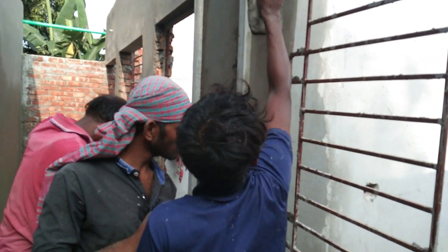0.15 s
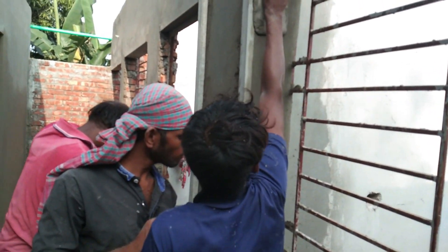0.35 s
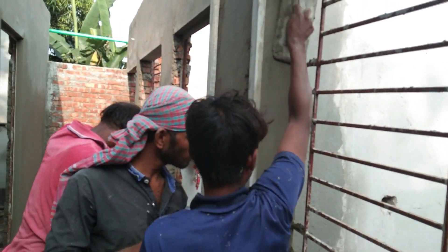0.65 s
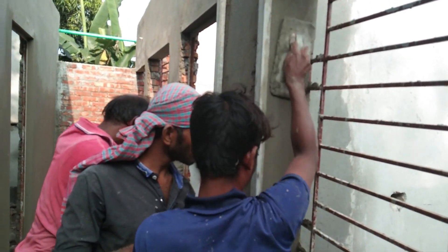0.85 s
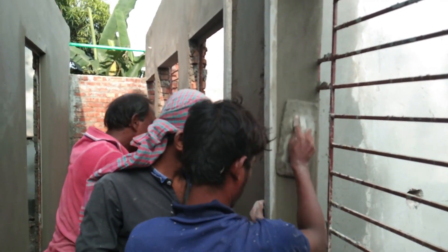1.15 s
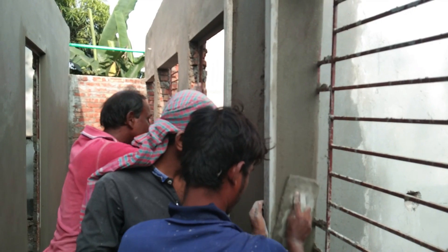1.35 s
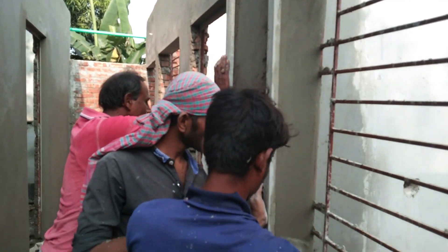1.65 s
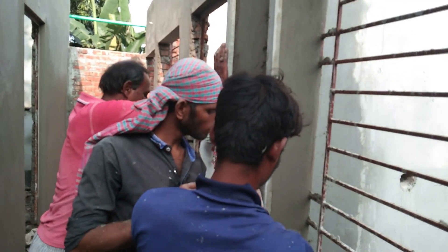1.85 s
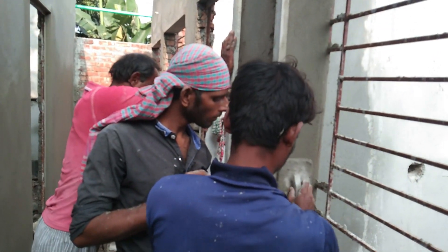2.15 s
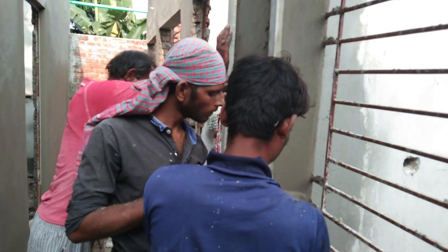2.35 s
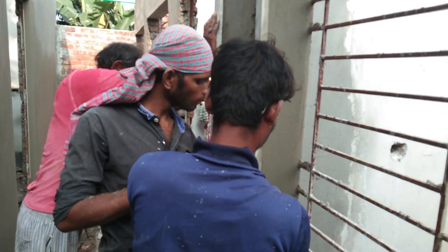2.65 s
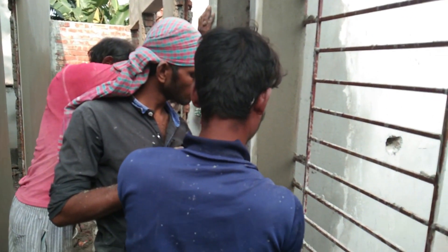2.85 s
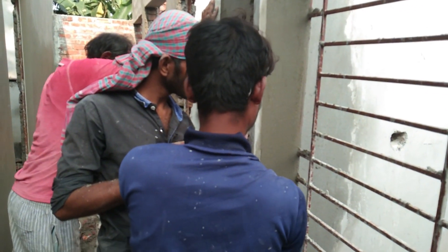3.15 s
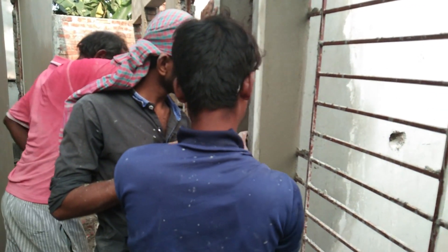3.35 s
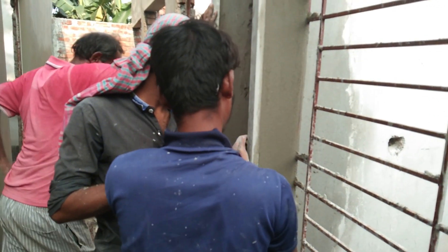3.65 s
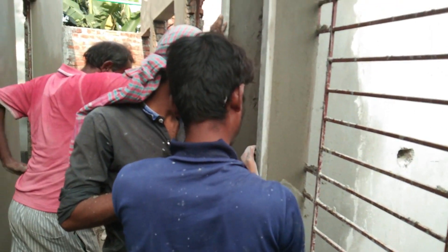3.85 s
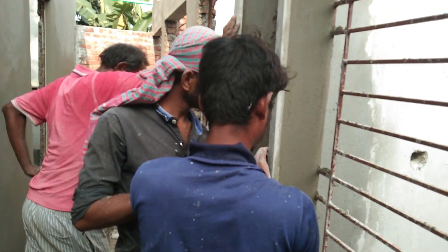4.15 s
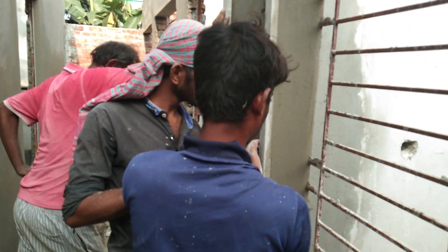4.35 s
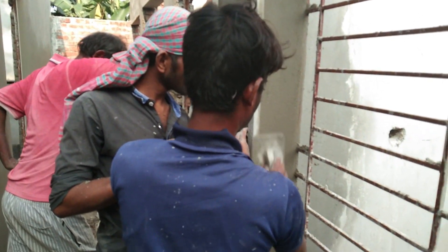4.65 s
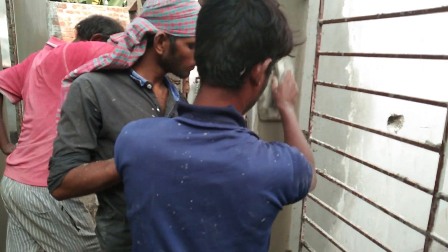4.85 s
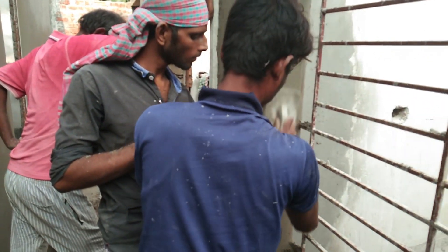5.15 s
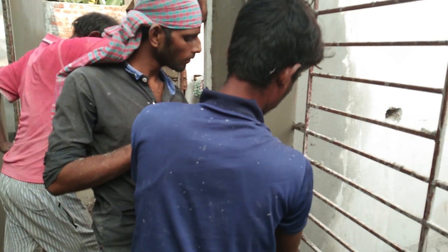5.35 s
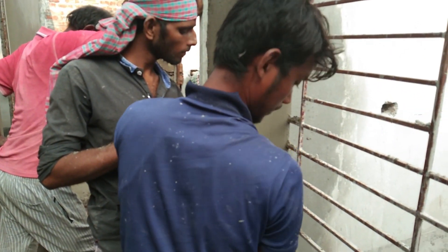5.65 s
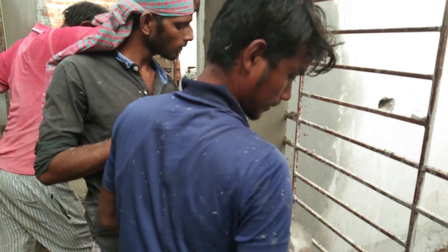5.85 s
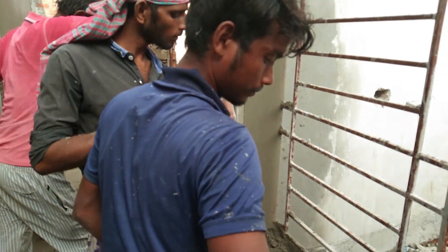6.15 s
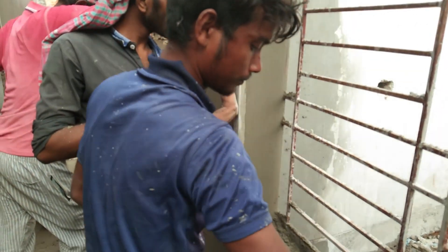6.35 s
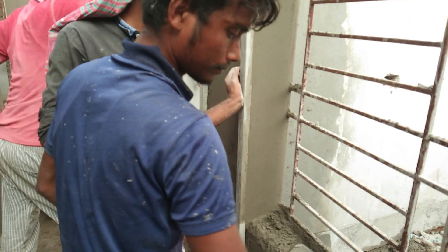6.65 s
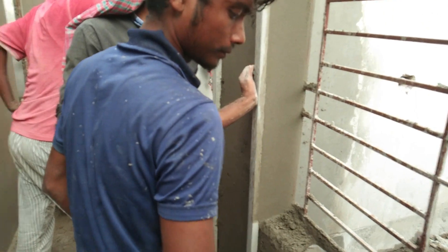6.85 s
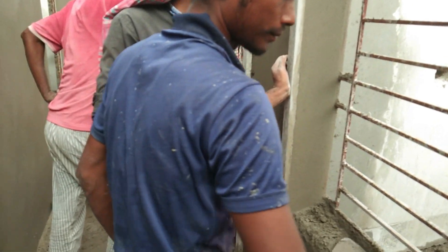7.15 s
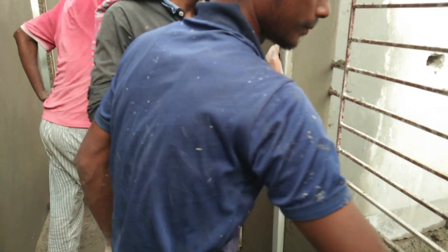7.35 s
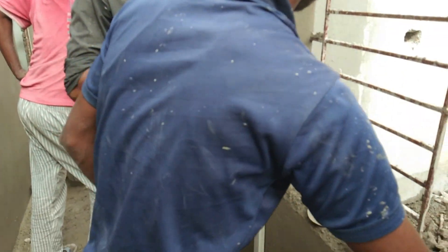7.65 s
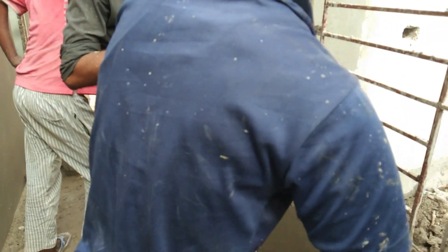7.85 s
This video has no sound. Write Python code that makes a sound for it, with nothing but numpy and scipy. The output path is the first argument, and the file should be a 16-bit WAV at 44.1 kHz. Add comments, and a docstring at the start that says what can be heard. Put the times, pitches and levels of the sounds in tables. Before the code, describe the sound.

A steel trowel scrapes wet plaster in uneven gritty strokes, with one sharp knock, distant dull thuds and a few bird chirps.

```python
"""Trowel on wet plaster.

A trowel smooths cement plaster on a pillar in an unfinished, roofless brick room.
Sand slips hiss and tick through the steel blade's resonances; it knocks once, then scoops mortar.
Distant building work and the knock's low thump thud through the masonry; birds whistle outside."""
import sys
import numpy as np
from scipy import signal
from scipy.fft import rfft, irfft, next_fast_len
from scipy.io import wavfile
from scipy.ndimage import uniform_filter1d, map_coordinates

SR = 44100
rng = np.random.default_rng(int(sys.argv[2]) if len(sys.argv) > 2 else 0)


def wav_record(signal):
    """Record a signal, one row per channel, as 16-bit PCM in the file named by sys.argv[1]."""
    frames = np.transpose(np.atleast_2d(signal))
    bounded = np.clip(frames, -1, 1)
    # unit amplitude maps onto the largest positive 16-bit level
    quanta = np.round(bounded * 32767).astype(np.int16)
    wavfile.write(sys.argv[1], SR, quanta)


N = 353152

# Spectra: freq_hz, density_db
AIR_SPECTRUM = [(20, -28), (45, 1.5), (70, 0), (150, 2.5), (400, -9), (1500, -20), (4000, -20),
                (8000, -31.5), (15000, -39)]
MASONRY_SPECTRUM = [(50, -13), (80, 13), (100, -7.5), (130, 7.5), (190, 4), (260, 4), (330, -3.5), (430, 0),
                    (530, 0.5), (640, -1.5), (790, -1), (1200, -1)]
GRAIN_SPECTRUM = [(80, -76.5), (350, -41), (1200, -17), (1800, -6.5), (3000, -0.5), (4300, 2.5), (5400, 5),
                  (7000, -1.5), (10000, -17.5), (15500, -32.5)]
MORTAR_SPECTRUM = [(180, -79), (300, -67), (535, -30), (631, -35), (892, -21.5), (1460, -15.5), (1590, -13),
                   (2100, -5), (2930, -4.5), (3280, -4.5), (5300, -4), (6680, -17), (15500, -33.5)]
PASTE_SPECTRUM = [(900, -54.5), (1900, -16), (2400, -3), (2850, 2), (3300, 1.5), (4200, 3.5), (5200, -0.5),
                  (6200, -5.5), (7200, -24), (9000, -28.5), (15000, -32)]
PLATE_SPECTRUM = [(200, -45.5), (400, -36.5), (560, 4), (720, 2), (1000, -2), (1200, 0), (1400, -1),
                  (1800, 0.5), (2100, 1.5), (2800, -15), (4500, -6.5), (9000, -51)]
EDGE_SPECTRUM = [(1500, -7.5), (3500, -21.5), (5500, 10.5), (7500, 1.5), (9000, -4), (11000, -9.5),
                 (15500, -22)]
# Room decay: freq_hz, t60_s
WALL_DECAY = [(150, 1), (1000, 0.28), (4000, 0.48), (12000, 0.28)]
# Dull thuds of distant building work, plus the low thump of the trowel's knock:
# start_s, level_db, swell_s (at 200 Hz), low_hz, high_hz
WALL_THUDS = [(-.03, -51, 0.063, 221, 485), (.125, -52, 0.092, 450, 750), (.285, -49.5, 0.051, 190, 380),
              (.664, -47, 0.1, 163, 1240), (1.295, -59, 0.024, 166, 260), (1.497, -46.5, 0.071, 85, 1200),
              (1.805, -53, 0.066, 172, 400), (2.308, -45.5, 0.09, 169, 950), (2.45, -49.5, 0.051, 60, 170),
              (2.98, -65, .06, 207, 400), (3.158, -51, 0.048, 176, 330), (3.383, -65, 0.027, 251.5, 400),
              (3.52, -59.5, 0.058, 271, 420), (3.68, -47, 0.08, 316, 1250), (3.756, -42, 0.1, 99, 477),
              (3.955, -42, 0.082, 122, 1160), (4.2, -55.5, 0.059, 294, 440), (4.79, -55.5, 0.053, 179, 298),
              (4.875, -52, 0.032, 490, 875), (5.06, -58.5, 0.047, 187, 313), (5.606, -44, 0.076, 192, 1060),
              (5.89, -73, 0.023, 199, 320), (6.455, -46, 0.1, 208, 403), (6.547, -35.5, 0.039, 140, 910),
              (6.632, -41.5, 0.051, 72.3, 190.3), (7.139, -63, 0.065, 270, 380),
              (7.262, -60.5, 0.082, 570, 800), (7.28, -52.5, 0.05, 178, 298)]
# Two-note chirps: start_s, arch_s, top_hz, arch_db, low_s, low_hz, low_db
BIRD_CHIRPS = [(4.797, 0.096, 5000, -38.5, 0.095, 3770, -47.5),
               (5.571, 0.038, 4770, -43.5, 0.06, 3686, -46.5), (6.15, 0.045, 5000, -45, 0.065, 3787, -44.5),
               (6.632, 0.047, 4530, -49.5, 0.095, 3646, -49.5)]
# First note's contour: length_share, top_pitch_share
CHIRP_ARCH = [(0, .85), (.18, .92), (.33, .975), (.6, 1), (1, 0.93)]
# Far hoots and whistles: start_s, length_s, start_hz, middle_hz, end_hz, level_db
FAR_BIRD_CALLS = [(4.405, 0.22, 784, 762, 744, -54.5), (5.236, 0.109, 773, 814, 848, -53),
                  (5.44, 0.077, 832, 772, 777, -54.5), (5.737, 0.066, 790, 773, 822, -57.5),
                  (6.02, 0.061, 686, 687, 720, -59.5), (7.704, 0.085, 3200, 3410, 3530, -46)]
# Hollow plate drags: start_s, length_s, pitch_hz, level_db
PILLAR_SCUFFS = [(0.436, 0.12, 616, -70.5), (1.183, 0.038, 617, -57.5), (1.249, 0.17, 650, -63.5),
                 (1.729, 0.092, 543, -68), (1.95, 0.048, 837, -67.5), (2.226, 0.1, 553, -67.5),
                 (2.588, 0.081, 759, -62), (2.916, 0.18, 566, -61), (3.347, 0.14, 566, -57),
                 (3.533, 0.2, 556, -59.5), (3.821, 0.04, 1007, -48.5), (4.598, 0.097, 620, -60),
                 (4.964, 0.21, 646, -65.5), (5.15, .16, 1454, -62), (6.044, 0.1, 584, -67),
                 (0.13, .13, 780, -56.5), (2.929, .26, 1535, -64.5), (3.301, .1, 1540, -56.5),
                 (5.08, 0.19, 620, -67)]
# Thin rising hisses: start_s, length_s, start_hz, level_db
RISING_SWISHES = [(1.457, 0.092, 3440, -44.5), (4.502, 0.13, 3850, -42.5), (5.37, 0.21, 2357, -51),
                  (5.698, 0.46, 2320, -54), (6.051, 0.12, 3340, -47), (6.301, 0.33, 2323, -54.5),
                  (6.627, 0.16, 2420, -53), (7.12, 0.2, 2895, -55.5), (7.367, 0.37, 2673, -50.5),
                  (7.32, 0.26, 2004, -61.5), (5.76, 0.13, 1840, -65)]
# Blade resonances: centre_hz, width_hz, gain_db
BLADE_RESONANCES = [(553, 82, 0), (902, 25, -5), (1420, 54, -4), (1575, 23, -15), (2946, 40, -9),
                    (3570, 50, -13.5), (4630, 60, -11.5), (5190, 45, -9), (6980, 180, -12)]
# Contacts of the knock: start_s, ring_db, cutoff_hz, crack_db
KNOCK_CONTACTS = [(6.5422, -10, 910, -47), (6.5436, -1, 950, -36), (6.5452, -3, 6270, -16),
                  (6.5497, -6.5, 3010, -23)]
# Modes of the struck trowel and its edge: freq_hz, level_db, t60_s
KNOCK_MODES = [(524, -23, 0.18), (757, -13, 0.025), (916, -15, 0.035), (1130, -8, 0.018),
               (1330, -12, 0.035), (1550, -2, 0.024), (1905, -19, 0.04), (2272, -25, 0.07),
               (2824, -24, 0.04), (3450, -26, 0.03), (4676, -26, 0.04)]
CLINK_MODES = [(4930, 5, 0.034), (5530, 1.5, 0.064), (5350, -23, 0.019), (6100, -25, .04),
               (7400, -22, 0.026)]
# Edge catches: start_s, level_db
EDGE_CLINKS = [(0.2991, -51), (0.338, -30), (6.959, -31), (7.03, -25.5), (7.039, -25)]
# Loudest grains under the edge: start_s, level_db, tilt_db_per_octave
COARSE_GRAINS = [(.185, -35.5, 4), (.2117, -30, 7), (0.2414, -25, 5), (0.2981, -20.5, 5.5),
                 (0.3048, -26.5, 10), (0.3364, -22.5, 5), (.342, -30, 12), (0.429, -32.5, 5),
                 (0.77, -27.5, -4.5), (3.3015, -28.5, 1.5), (6.52, -33.5, -12.5), (6.907, -31, -3),
                 (6.9288, -30, -3), (6.9576, -23, -3.5), (7.031, -20.5, -2.5), (7.04, -28.5, -4),
                 (7.623, -31, -3)]
# Digs into the mortar heap: start_s, length_s, crest_share, level_db
MORTAR_SCOOPS = [(6.926, 0.03, 0.59, -40), (6.973, 0.056, 0.72, -32), (7.548, 0.053, 0.49, -41),
                 (7.616, 0.048, 0.29, -34)]
# Smoothing strokes: start_s, length_s, crest_share, hiss_db, grind_db, bite_db, low_hz
TROWEL_STROKES = [(-.03, 0.275, 0.76, -51.5, -60.5, -63.5, 500), (0.211, 0.18, 0.7, -48.5, -46, -52.5, 455),
                  (0.431, 0.36, 0.042, -51.5, -52, -61.5, 616), (0.743, 0.14, 0.27, -46, -47.5, -60, 450),
                  (0.868, 0.15, 0.092, -44, -47.5, -59.5, 1210), (1.004, 0.16, 0.34, -46.5, -45, -59, 1190),
                  (1.199, 0.41, 0.61, -45, -46.5, -56, 1140), (1.624, 0.19, 0.85, -50, -75, -61, 2020),
                  (1.9, 0.16, 0.22, -46.5, -69, -58.5, 1400), (2.103, 0.32, 0.57, -44.5, -53, -57.5, 1350),
                  (2.467, 0.38, 0.43, -43.5, -52.5, -57.5, 1490),
                  (2.882, 0.3, 0.17, -45.5, -58, -58.5, 1240), (3.233, 0.11, 0.18, -56.5, -76, -64.5, 2480),
                  (3.315, 0.15, 0.36, -47, -49.5, -49, 1240), (3.492, 0.14, 0.49, -45.5, -44, -51, 690),
                  (3.663, 0.093, 0.65, -42.5, -45.5, -47.5, 450),
                  (3.77, 0.081, 0.2, -47.5, -50.5, -54, 450), (3.877, 0.14, 1, -48.5, -49.5, -51.5, 450),
                  (4.056, 0.38, 0.53, -45, -50.5, -53, 493), (4.47, 0.077, 0.38, -54.5, -68, -65, 745),
                  (4.57, 0.17, 0.77, -45.5, -46, -49.5, 730), (4.788, 0.15, 0.79, -47, -52.5, -56, 500),
                  (4.97, 0.14, 0.1, -67.5, -62.5, -69, 1200), (5.125, 0.39, 0.17, -50.5, -53, -59.5, 1000),
                  (5.865, 0.24, 0.64, -64.5, -75, -74, 1411), (6.022, 0.26, 0.96, -56.5, -59, -68.5, 1130),
                  (6.064, 0.049, 0.13, -46, -51.5, -56, 611), (6.326, 0.31, 0.77, -83.5, -53.5, -97, 1360),
                  (6.795, 0.12, 0.81, -56.5, -62, -61, 1507), (7.314, 0.34, 1, -53, -58, -74, 2020),
                  (7.617, 0.074, 1, -56.5, -42.5, -55, 690)]


def amp(db):
    """Decibels to gain."""
    return 10 ** (np.asarray(db) / 20)


def unit(x):
    """Scale to rms 1."""
    return x / np.sqrt(np.mean(x ** 2) + 1e-20)


def along(points, hz):
    """Interpolate (freq_hz, value) points on a log axis."""
    freqs_hz, values = np.transpose(points)
    return np.interp(np.log(hz + 1), np.log(freqs_hz + 1), values)


def clock(length_s):
    """Sample times in seconds."""
    return np.arange(int(length_s * SR)) / SR


def add(track, start_s, sound):
    """Mix a sound into the track."""
    start = round(start_s * SR)
    part = sound[max(-start, 0):max(len(track) - start, 0)]
    track[max(start, 0):][:len(part)] += part


def wobble(rate_hz, size=N):
    """Smooth random curve, rate_hz knots a second."""
    knots = rng.standard_normal(int(size * rate_hz / SR) + 4)
    return map_coordinates(knots, [np.arange(size) * rate_hz / SR])


def filtered(x, response):
    """Apply a frequency response."""
    size = next_fast_len(len(x) + 8192)
    return irfft(rfft(x, size) * response(np.fft.rfftfreq(size, 1 / SR)), size)[:len(x)]


def moving_highpass(x, low_hz):
    """Steep high-pass, cutoff given per sample."""
    hz, t, bands = signal.stft(x, SR, nperseg=512)
    cutoff_hz = np.interp(t, np.arange(N) / SR, low_hz)
    loss = np.sqrt(1 + (cutoff_hz / (hz[:, None] + 1)) ** 10)
    return signal.istft(bands / loss, SR, nperseg=512)[1][:N]


def ragged(pitch_hz, width_hz):
    """Uneven noise band around a pitch given per sample."""
    size, phase = len(pitch_hz), 2 * np.pi * np.cumsum(pitch_hz) / SR
    band = wobble(width_hz, size) * np.cos(phase) + wobble(width_hz, size) * np.sin(phase)
    return band * amp(4 * wobble(70, size))


def air():
    """Faint outdoor hush."""
    gain = amp(-74.5 + 0.91 * wobble(22))
    return gain * unit(filtered(rng.standard_normal(N), lambda hz: amp(along(AIR_SPECTRUM, hz))))


def room(x):
    """Bare-wall reverb; each frequency decays at its own rate."""
    hz, t, bands = signal.stft(rng.standard_normal(SR), SR, nperseg=256)
    decay = amp(-60 * t / along(WALL_DECAY, hz)[:, None])
    tail = signal.istft(bands * decay, SR, nperseg=256)[1]
    return signal.fftconvolve(x, np.pad(tail / np.linalg.norm(tail), (200, 0)))[:N]


def thuds():
    """Blows carried by masonry: highs arrive first, lows swell later and linger."""
    out = np.zeros(N)
    for start_s, level_db, swell_s, low_hz, high_hz in WALL_THUDS:
        hz, t, bands = signal.stft(rng.standard_normal(SR), SR, nperseg=1024)
        hz = hz[:, None] + 1
        age = t / (swell_s * (200 / hz) ** 0.41)  # 1 at each band's peak
        swell = (age * np.exp(1 - age)) ** 1.38
        passband = 1 / np.sqrt((1 + (low_hz / hz) ** 10) * (1 + (hz / high_hz) ** 10))
        masonry = unit(passband * amp(along(MASONRY_SPECTRUM, hz)))
        add(out, start_s, amp(level_db) * signal.istft(bands * swell * masonry, SR, nperseg=1024)[1])
    return out


def whistle(pitch_hz, waver_share, flutter_db):
    """A bird's near-pure tone, fluttering as it fades in and out."""
    size = len(pitch_hz)
    wavering_hz = pitch_hz * (1 + waver_share * wobble(250, size))
    swell = signal.windows.tukey(size, .28) * amp(flutter_db * wobble(50.5, size))
    return unit(swell * np.sin(2 * np.pi * np.cumsum(wavering_hz) / SR))


def twitter(count, start_s=7.855, length_s=0.17, note_s=0.029):
    """Far flock: tiny overlapping notes, each sliding its own way."""
    out, progress = np.zeros(N), clock(note_s) / note_s
    for k, (offset, slide) in enumerate(rng.uniform(-1.4, 1, (count, 2))):
        pitch_hz = 4820 * 2 ** (.24 * offset + .12 * slide * progress)
        note = whistle(pitch_hz, waver_share=0.015, flutter_db=3.5)
        add(out, start_s + length_s * k / count, amp(-62) * note)
    return out


def birds(slide_s=0.015, far_waver_hz=16):
    """Chirps arch, then break to a lower falling note; farther birds give plain notes."""
    out = np.zeros(N)
    for start_s, arch_s, top_hz, arch_db, low_s, low_hz, low_db in BIRD_CHIRPS:
        arch = np.interp(clock(arch_s) / arch_s, *np.transpose(CHIRP_ARCH))
        high_note = whistle(top_hz * arch, waver_share=.012, flutter_db=2)
        add(out, start_s, amp(arch_db + 40 * (arch - 1)) * high_note)  # loudest at the top
        slide = 1 + .1 * np.exp(-clock(low_s) / slide_s)
        low_note = whistle(low_hz * slide, waver_share=.006, flutter_db=3)
        add(out, start_s + arch_s, amp(low_db) * low_note)
    for start_s, length_s, start_hz, middle_hz, end_hz, level_db in FAR_BIRD_CALLS:
        pitch_hz = np.interp(clock(length_s) / length_s, [0, .5, 1], [start_hz, middle_hz, end_hz])
        note = whistle(pitch_hz, waver_share=far_waver_hz / middle_hz, flutter_db=2.5)
        add(out, start_s, amp(level_db - 2.5) * note)
    return out


def steel(force, spectrum):
    """Friction force shaped by a spectrum and the blade's resonances, rms 1."""
    def response(hz):
        peaks = sum(amp(gain_db) * 1j * hz * width_hz / (centre_hz ** 2 - hz ** 2 + 1j * hz * width_hz)
                    for centre_hz, width_hz, gain_db in BLADE_RESONANCES)
        return amp(along(spectrum, hz)) * (1 + peaks)
    return unit(filtered(force, response))


def sand(rate_hz, spread_db):
    """Grain slips: random impulses of uneven size."""
    slips = rng.random(N) < rate_hz / SR
    signs = rng.choice([-1, 1], N)
    sizes = amp(spread_db * np.minimum(rng.exponential(size=N), 4))
    return unit(slips * signs * sizes)


def crushed_sand(tilt_db_per_octave):
    """Tilted grain spectrum."""
    return [(hz, level_db + tilt_db_per_octave * np.log2(hz)) for hz, level_db in GRAIN_SPECTRUM]


def patchy(x, depth_db):
    """The contact patch shifts, so bands swell and fade on their own."""
    bands = signal.stft(x, nperseg=1024)[2]
    field = uniform_filter1d(rng.standard_normal(bands.shape), size=4, axis=0)
    field = uniform_filter1d(field, size=8, axis=1)
    return signal.istft(bands * amp(depth_db * unit(field)), nperseg=1024)[1][:N]


def faint_rustle():
    """Faint, steady, grainy high rustle in the background."""
    return amp(-80 + 3 * wobble(4.4)) * steel(sand(rate_hz=1700, spread_db=2), crushed_sand(3))


def scuffs():
    """The dragging plate stirs a hollow note in the pillar; pitch varies by place."""
    out = np.zeros(N)
    for start_s, length_s, centre_hz, level_db in PILLAR_SCUFFS:
        pitch_hz, width_hz = np.full(int(length_s * SR), centre_hz), 0.2 * centre_hz
        note = ragged(pitch_hz, width_hz) + amp(-4) * ragged(pitch_hz, 4 * width_hz)
        add(out, start_s, amp(level_db) * unit(note * signal.windows.tukey(len(note), .4)))
    return out


def swishes(climb_octaves_per_s=0.71):
    """Rising hiss: a narrow core in a wider skirt."""
    out = np.zeros(N)
    for start_s, length_s, start_hz, level_db in RISING_SWISHES:
        t, width_hz = clock(length_s), .09 * start_hz
        pitch_hz = start_hz * 2 ** (climb_octaves_per_s * t)
        hiss = unit(ragged(pitch_hz, width_hz) + amp(-2.5) * ragged(pitch_hz, 3 * width_hz))
        add(out, start_s, amp(level_db) * hiss * np.sin(np.pi * t / length_s) ** .5)
    return out


def knock():
    """The loaded trowel lands softly, hits hard and chatters; mortar damps its ring and scatters."""
    out, t = np.zeros(N), clock(.2)
    rise = 1 - np.exp(-(t / 0.0011) ** 2)  # wet mortar cushions each contact
    for start_s, ring_db, cutoff_hz, crack_db in KNOCK_CONTACTS:
        ring = np.zeros(len(t))
        for hz, mode_db, t60_s in KNOCK_MODES:
            lowpass = 1 / np.sqrt(1 + (hz / cutoff_hz) ** 12)
            decay = amp(mode_db + rng.normal(0, 0.33) - 60 * t / t60_s)
            ring += lowpass * decay * np.sin(2 * np.pi * hz * t)
        crack = steel(rng.standard_normal(len(t)), crushed_sand(-9)) * amp(-60 * t / 0.026)
        scatter = steel(rng.standard_normal(len(t)), PLATE_SPECTRUM) * amp(-21 - 60 * t / 0.11)
        add(out, start_s, rise * amp(ring_db) * ring + np.sqrt(rise) * amp(crack_db) * (crack + scatter))
    return out


def stroke_gain(start_s, length_s, crest_share, arch_db=6, land_db_per_s=339, lift_db_per_s=171):
    """One arm movement: the blade lands fast, presses hardest at the crest, lifts more slowly."""
    t, end_s = np.arange(N) / SR, start_s + length_s
    crest_s = start_s + length_s * np.clip(crest_share, .02, .98)
    slack = np.interp(t, [start_s, crest_s, end_s], [1, 0, 1])
    land_db = land_db_per_s * np.maximum(start_s - t, 0)
    lift_db = lift_db_per_s * np.maximum(t - end_s, 0)
    return amp(np.maximum(-arch_db * slack ** 2 - land_db - lift_db, -100))


def scoops():
    """The blade crunches through loose mortar in small jerks."""
    depth = sum(amp(level_db) * stroke_gain(*timing) for *timing, level_db in MORTAR_SCOOPS)
    crunch = steel(patchy(sand(rate_hz=3000, spread_db=-0.5), depth_db=3.5), MORTAR_SPECTRUM)
    return depth * amp(2.1 * wobble(120)) * crunch


def clinks(rough_rad=1.1):
    """The edge snaps free of a stone and rings, roughened by sand."""
    out, t = np.zeros(N), clock(.15)
    rise = 1 - np.exp(-t / 0.00093)
    for start_s, level_db in EDGE_CLINKS:
        for hz, mode_db, t60_s in CLINK_MODES:
            phase = 2 * np.pi * hz * t + rough_rad * wobble(660, len(t))
            add(out, start_s, rise * amp(level_db + mode_db - 60 * t / t60_s) * np.sin(phase))
    return out


def grit(bite_db, strays_per_s=16):
    """Coarse grains crack, then crumble; stray ones follow the edge's bite in level."""
    out, t = np.zeros(N), clock(0.12)
    onsets = np.flatnonzero(rng.random(N) < strays_per_s / SR)
    strays = [(i / SR, bite_db[i] + 15 + rng.standard_normal(), -0.5) for i in onsets]
    crack = amp(1.5 - 60 * t / 0.0072)
    crumble = amp(2 - 60 * t / 0.087)
    rise = 1 - np.exp(-t / 0.0005)
    for start_s, level_db, tilt_db_per_octave in COARSE_GRAINS + strays:
        noise = steel(rng.standard_normal(len(t)), crushed_sand(tilt_db_per_octave))
        add(out, start_s, amp(level_db - 8.5) * rise * (crack + crumble) * noise)
    return out


def pressure():
    """All strokes summed: hiss_db, grind_db, bite_db and power-weighted low_hz per sample."""
    power, weighted_hz = np.zeros((3, N)), np.zeros(N)
    for start_s, length_s, crest_share, *levels_db, low_hz in TROWEL_STROKES:
        stroke_power = np.outer(amp(levels_db), stroke_gain(start_s, length_s, crest_share)) ** 2
        power += stroke_power
        weighted_hz += stroke_power.sum(axis=0) * low_hz
    return *(10 * np.log10(power)), weighted_hz / power.sum(axis=0)


def scrape(hiss_db, grind_db, bite_db, low_hz):
    """Wet paste hisses, the plate grinds, the edge bites dry sand; a flatter blade sounds deeper."""
    fine, coarse = sand(rate_hz=9000, spread_db=2.5), sand(rate_hz=2500, spread_db=1)
    paste = amp(hiss_db + 4) * steel(patchy(fine, depth_db=2.2), PASTE_SPECTRUM)
    plate = amp(grind_db - 1.5) * steel(patchy(coarse, depth_db=3.5), PLATE_SPECTRUM)
    dry_sand = sand(rate_hz=7000, spread_db=4)
    edge = amp(bite_db + 7) * steel(patchy(dry_sand, depth_db=2.2), EDGE_SPECTRUM)
    judder = amp(0.8 * wobble(55))  # the hand glides unevenly
    return judder * moving_highpass(paste + plate + edge, low_hz)


def scene():
    """Mono mix: trowel close and fairly dry, birds with strong wall reflections."""
    hiss_db, grind_db, bite_db, low_hz = pressure()
    blade = scrape(hiss_db, grind_db, bite_db, low_hz)
    blade = blade + grit(bite_db) + clinks() + scoops() + swishes() + faint_rustle()
    blow, hollow, calls, background = knock(), scuffs(), birds(), thuds() + air()
    near = blade + amp(-13) * room(blade)
    near += blow + amp(-12.5) * room(blow)
    near += amp(-3) * hollow + amp(-3.5) * room(hollow)
    far = amp(1.5) * calls + amp(-1.5) * room(calls + twitter(count=20)) + background
    return (near + far)[None]


def record(dry):
    """Brick-wall low-pass at 15.8 kHz."""
    return np.array([filtered(channel, lambda hz: hz < 15800) for channel in dry])


dry = scene()
out = record(dry)
wav_record(out)
```